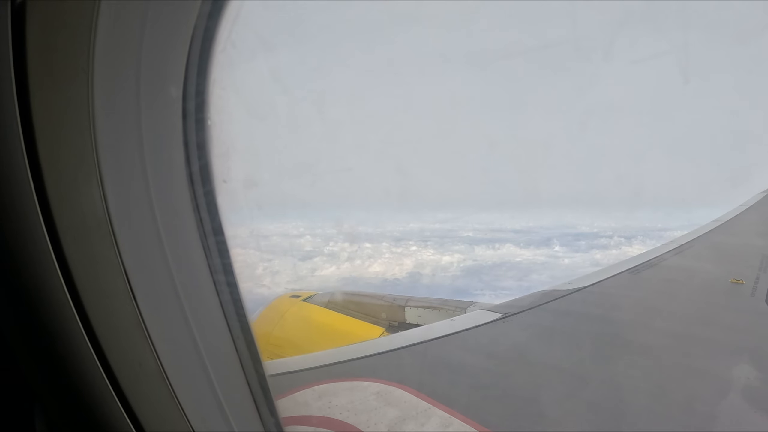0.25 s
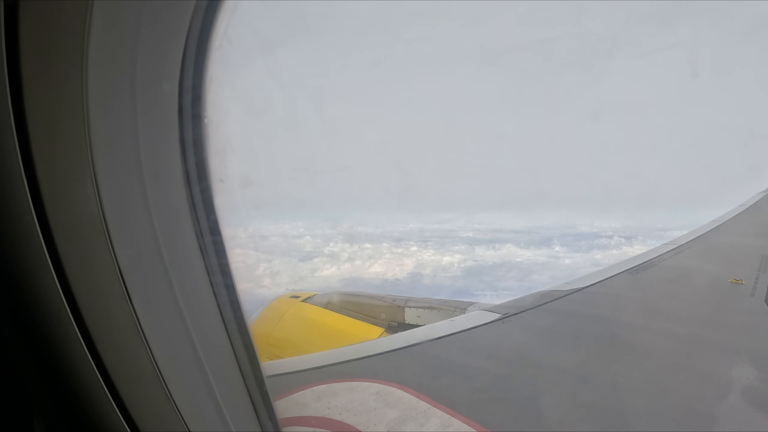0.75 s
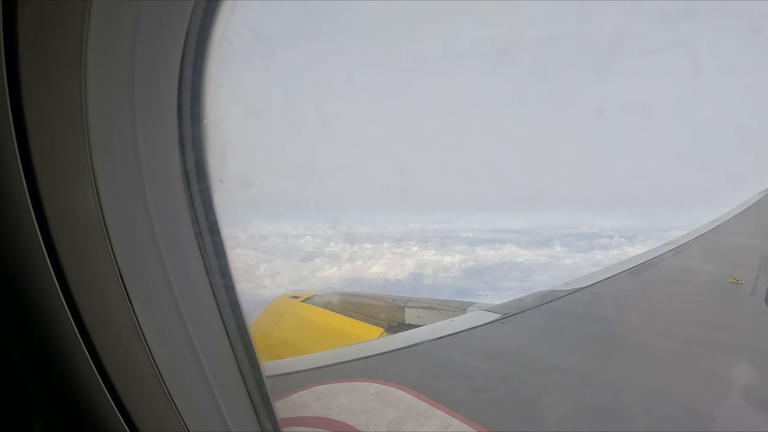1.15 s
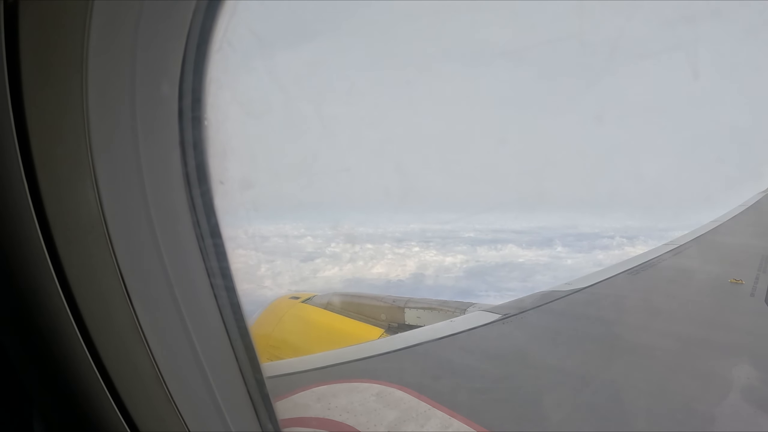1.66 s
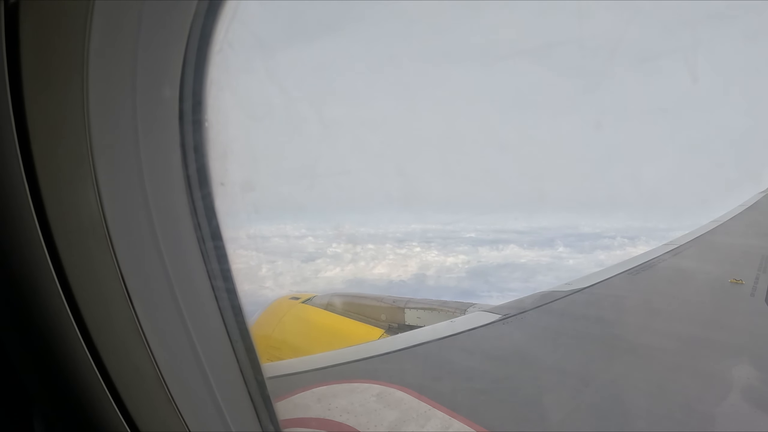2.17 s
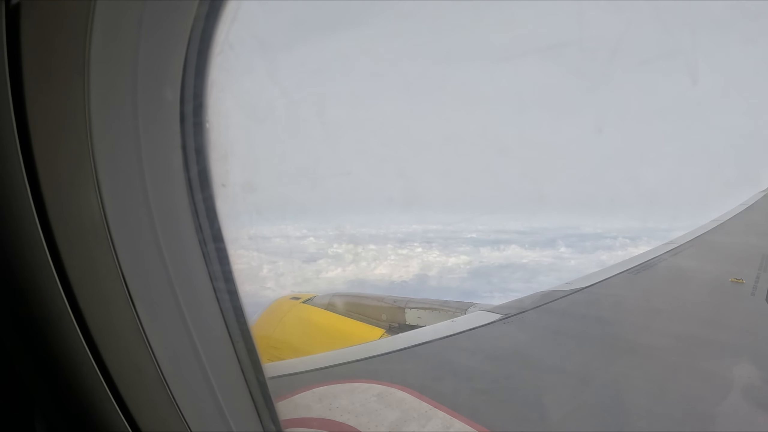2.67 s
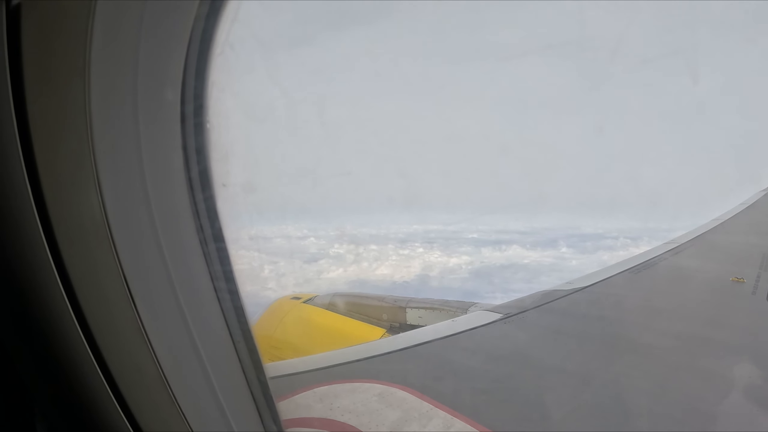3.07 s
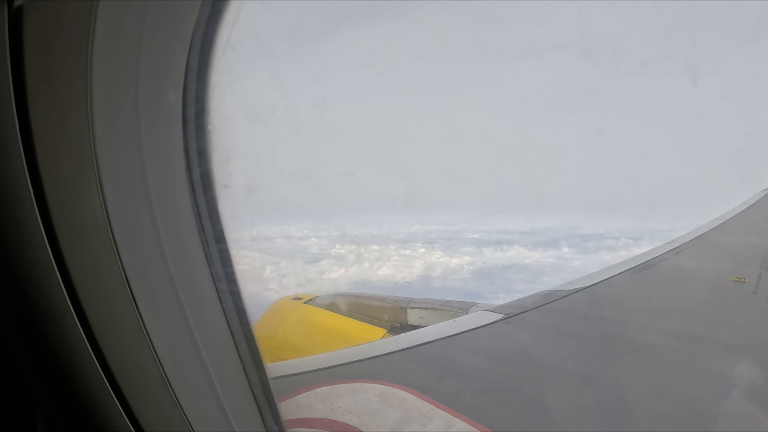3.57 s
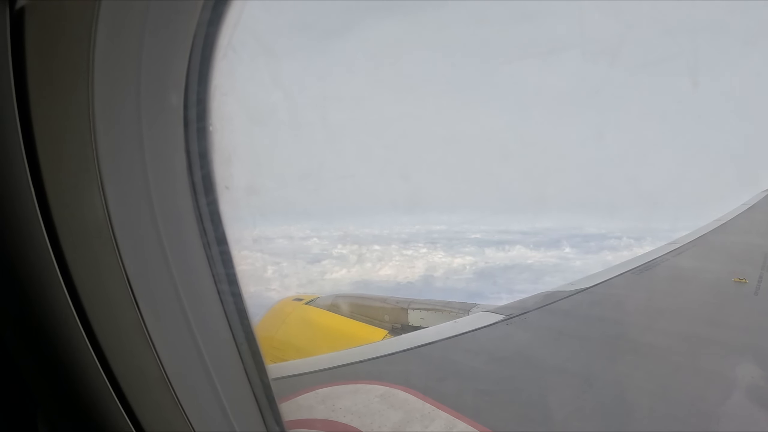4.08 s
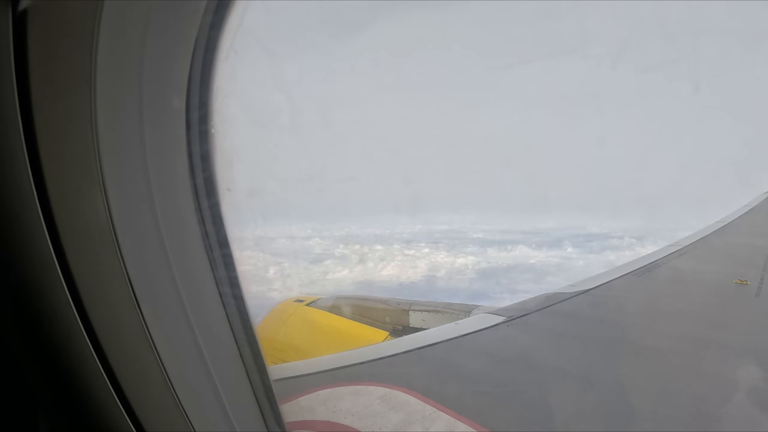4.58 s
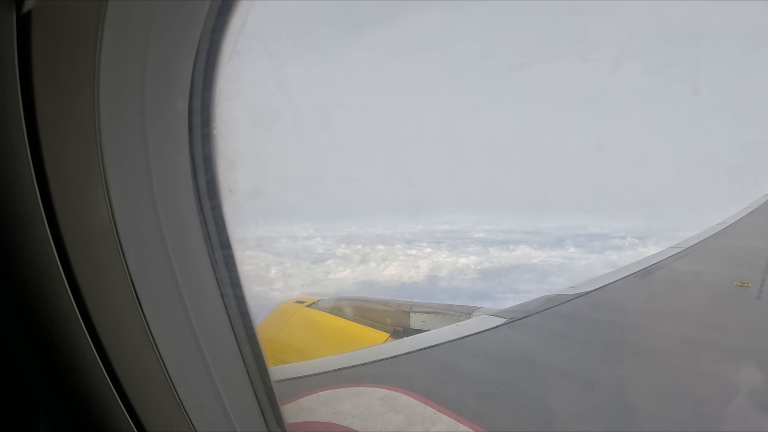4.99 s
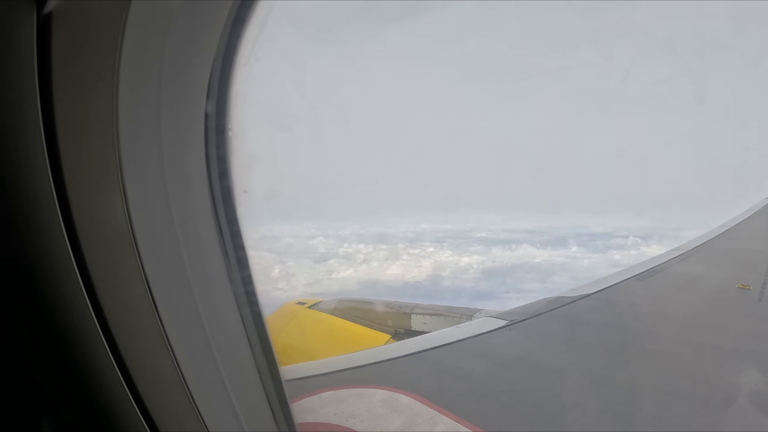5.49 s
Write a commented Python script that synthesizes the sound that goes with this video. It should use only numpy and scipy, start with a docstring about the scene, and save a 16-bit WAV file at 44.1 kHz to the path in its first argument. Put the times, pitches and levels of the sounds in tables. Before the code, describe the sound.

Steady, deep jet cabin roar with a wavering bass hum, soft airy vent hiss, a thin constant whine and a few faint plastic ticks.

```python
"""Airflow over the fuselage of a cruising airliner roars through the cabin wall: resonance-shaped noise.
Engine shafts hum and beat in the bass as slightly wandering sines, and a hollow noise band throbs evenly.
The vents hiss as duct-coloured noise with a narrow-band whistle, and fans and pumps whine as thin tones.
A few faint plastic ticks sound close to the window seat: decaying noise bursts."""
import sys
import numpy as np
from scipy import signal
from scipy.fft import rfft, irfft, next_fast_len
from scipy.io import wavfile
from scipy.ndimage import uniform_filter1d, minimum_filter1d, map_coordinates

SR = 44100
rng = np.random.default_rng(int(sys.argv[2]) if len(sys.argv) > 2 else 0)


def pcm_store(signal):
    """Save signal as 16-bit PCM."""
    levels = np.round(np.clip(np.atleast_2d(signal), -1, 1) * 32767)
    wavfile.write(sys.argv[1], SR, levels.astype(np.int16).T)


N = 253134  # length [samples]


def amp(db):
    """Logarithmic level: decibels to amplitude gain."""
    return 10 ** (np.asarray(db) / 20)


def unit(x):
    """Normalisation by mean power: scale to rms 1."""
    return x / np.sqrt(np.mean(x ** 2) + 1e-20)


def along(points, hz):
    """Logarithmic frequency scale: interpolate (frequency [Hz], value) points along it."""
    f, v = np.transpose(points)
    return np.interp(np.log(hz + 1), np.log(f + 1), v)


def humps(rows, hz):
    """Resonance: sum bell-shaped gains [dB], each falling to half its dB at half its width from the centre."""
    return sum(db * np.exp2(-(2 * (hz - centre) / width) ** 2) for centre, width, db in rows)


def curves(rows):
    """Envelope: interpolate each column of (time [s], value, ..) rows at every sample."""
    s, *columns = np.transpose(rows)
    return [np.interp(np.arange(N) / SR, s, column) for column in columns]


def wobble(rate):
    """Random modulation: a smooth curve through `rate` normally distributed knots a second."""
    knots = rng.standard_normal(int(N * rate / SR) + 4)
    return map_coordinates(knots, [np.arange(N) * rate / SR])


def filtered(x, response):
    """Linear filtering: multiply the spectrum of x by a response of frequency."""
    m = next_fast_len(N + SR // 2)
    hz = np.fft.rfftfreq(m, 1 / SR)
    return irfft(rfft(x, m) * response(hz), m)[..., :N]


def panned(lean_db):
    """Interaural level difference: left and right gains, positive dB to the left."""
    return amp(np.array([[.5], [-.5]]) * lean_db)


# likeness of the two channels: (frequency [Hz], correlation)
CHANNEL_CORRELATION = [(40, .9995), (90, .998), (180, .99), (350, .96), (700, .93), (1350, .84),
                       (2600, .52), (4600, .67), (9000, .55)]
# lean to the left: (frequency [Hz], left-right difference [dB])
LEFT_LEAN = [(90, 0), (280, -1), (680, 1), (1100, 1.5), (1700, -0.5), (2700, 4), (4100, 2.5), (5200, -0.5),
             (7400, 4.5), (9800, 2), (12000, 6)]


def rush(colour_db, patchy_db):
    """Diffuse sound field: noise of rms 1 with turbulent patches, the channels nearly alike in the bass."""
    z = signal.stft(rng.standard_normal((2, N)), nperseg=512)[2]
    # smooth over frequency, then over time, to make patches shared by both channels
    field = uniform_filter1d(rng.standard_normal(z.shape[1:]), size=7, axis=0)
    field = uniform_filter1d(field, size=16, axis=1)
    pair = signal.istft(z * amp(patchy_db * unit(field)), nperseg=512)[1][:, :N]

    def mid_side_response(hz):
        # the mid-side power balance sets the correlation of left and right
        turn = np.arccos(np.clip(along(CHANNEL_CORRELATION, hz), -1, 1)) / 2
        return amp(colour_db(hz)) * [np.cos(turn), np.sin(turn)]

    mid, side = filtered(pair, mid_side_response)
    left_right = np.array([mid + side, mid - side])
    return unit(filtered(left_right, lambda hz: panned(along(LEFT_LEAN, hz))))


def tone(hz, wander, rate):
    """Frequency modulation: a sine of rms 1 whose pitch wanders on the scale of `wander` [Hz]."""
    turns = np.cumsum(hz + wander * wobble(rate)) / SR + rng.random()
    return np.sqrt(2) * np.sin(2 * np.pi * turns)


# spectrum of the airflow heard through the wall: (frequency [Hz], relative density [dB per Hz])
ROAR_SPECTRUM = [(10, -22.5), (20, -15.5), (27, -4.5), (34, -12.5), (44, 1.5), (65, -2), (135, -3.5),
                 (200, -5), (345, -6), (420, -13), (600, -15.5), (840, -21.5), (1250, -24), (1780, -34),
                 (2600, -110)]
# wall panel and cabin resonances, and the hollows between: (frequency [Hz], width [Hz], gain [dB])
PANEL_RESONANCES = [(73, 16, -2), (102, 13, 4), (182, 39, 5.5), (223, 20, -0.5), (272.7, 35.6, 4.5),
                    (322, 19, -3), (333, 16, 2), (497, 105, 4.5), (698.5, 40, 4), (760, 50, 1)]


def airflow():
    """Boundary-layer excitation: the flow shakes the wall, whose panels favour their own resonances."""
    colour_db = lambda hz: along(ROAR_SPECTRUM, hz) + humps(PANEL_RESONANCES, hz)
    return amp(-17.0) * rush(colour_db, patchy_db=.5)


# near engine's shaft speeds [turns/s] and the slow shaft's steady loss of speed [Hz/s]
SLOW_SHAFT_HZ, FAST_SHAFT_HZ, SAG_HZ_PER_S = 81.85, 164.25, .07
# the other engine's slow shaft: speed [turns/s], level [dB]
FAR_SHAFT_HZ, FAR_HUM_DB = 84.1, -41
# the slow shaft's hum, a steady tone mixed with low noise that makes its level waver by chance:
# (time [s], level [dB])
SLOW_HUM_LEVEL = [(0, -21.5), (.5, -23.5), (.75, -30), (1.1, -28), (1.35, -23), (1.65, -24.5), (2.3, -22.5),
                  (2.55, -26.5), (3, -21.5), (3.25, -25.5), (3.5, -22), (4.2, -20.7), (4.65, -24),
                  (5.05, -23.5), (5.3, -20), (5.7, -21)]
# the fast shaft's hum, a steady tone mixed with low noise that makes its level waver by chance:
# (time [s], level [dB])
FAST_HUM_LEVEL = [(0, -28.5), (.3, -24.5), (.7, -28.5), (.9, -24.2), (1.4, -28), (1.7, -20.5), (1.9, -27),
                  (2.1, -24.5), (2.4, -29), (2.85, -25.5), (3.45, -28), (3.6, -23.5), (4.17, -30),
                  (4.47, -21), (4.83, -29.5), (5.15, -23.5), (5.45, -24), (5.7, -32)]


def shafts():
    """Rotating unbalance and beats: shaft hums come through the wings, and two close speeds beat faintly."""
    slow_db, = curves(SLOW_HUM_LEVEL)
    fast_db, = curves(FAST_HUM_LEVEL)
    slow_hz = SLOW_SHAFT_HZ - SAG_HZ_PER_S * np.arange(N) / SR
    slow = amp(slow_db) * tone(slow_hz, wander=0.08, rate=1.9)
    fast = amp(fast_db) * tone(FAST_SHAFT_HZ, wander=0.3, rate=4.4)
    far = amp(FAR_HUM_DB) * tone(FAR_SHAFT_HZ, wander=0.34, rate=1.9)
    return slow + fast + far


# spectrum of the hollow engine noise: (frequency [Hz], relative density [dB per Hz])
ENGINE_SPECTRUM = [(600, -110), (830, -30.0), (885, -12), (915, -3.0),
                   (950, -5), (1020, -11.0), (1200, -20.5), (2000, -110)]
BAND_DB, BAND_FADE_DB_PER_S = -36.5, .3  # mean level, slow fall
THROB_DB, THROB_HZ, FIRST_CREST_S = 1.5, 2.53, .1  # swing each way, rate, time of a crest


def engine_band():
    """Amplitude modulation: a narrow band of engine noise throbs evenly while slowly receding."""
    t = np.arange(N) / SR
    throb = np.cos(2 * np.pi * THROB_HZ * (t - FIRST_CREST_S))
    level_db = BAND_DB + THROB_DB * throb - BAND_FADE_DB_PER_S * (t - t.mean())
    return amp(level_db) * rush(lambda hz: along(ENGINE_SPECTRUM, hz), patchy_db=0.4)


# spectrum of the air from the vents: (frequency [Hz], relative density [dB per Hz])
VENT_SPECTRUM = [(500, -12), (1900, 3), (2650, 1), (3150, -3), (3550, -2.5), (3900, -6.5), (4450, -6),
                 (5600, -16), (6500, -18.5), (7450, -15.5), (8450, -25), (10000, -26), (11600, -33.5),
                 (14500, -46.5)]
# duct resonances and notches that colour the hiss: (frequency [Hz], width [Hz], gain [dB])
DUCT_RESONANCES = [(2050, 60, -1.5), (2230, 70, -2.5), (2980, 100, 2.5), (3150, 70, -2.5), (3320, 80, -1),
                   (3950, 110, 1.5), (3880, 80, -2), (4200, 200, 1.5), (8040, 200, 2), (8300, 400, -1),
                   (11080, 160, 2.5)]


def vents():
    """Duct resonance: the ducts colour a hiss of air whose level flutters slightly."""
    colour_db = lambda hz: along(VENT_SPECTRUM, hz) + humps(DUCT_RESONANCES, hz)
    return amp(-43.0 + 0.15 * wobble(7)) * rush(colour_db, patchy_db=0.58)


# breathy nozzle whistle, before its flutter: (time [s], level [dB])
WHISTLE_LEVEL = [(0, -62.5), (.55, -60), (1.1, -64.5), (2.3, -68), (2.7, -62.5), (3.1, -68), (5.7, -70)]


def nozzle_whistle():
    """Narrow-band noise: a breathy whistle near 3570 Hz that comes and goes, leaning left."""
    level_db, = curves(WHISTLE_LEVEL)
    # the amplitude response halves 58 Hz from the centre
    response = lambda hz: np.exp2(-((hz - 3570) / 58) ** 2)
    whistle = unit(filtered(rng.standard_normal(N), response))
    return panned(4) * amp(level_db + 1.2 * wobble(13)) * whistle


# tones of fans and pumps: (frequency [Hz], mean level [dB], wander scale [Hz], left-right difference [dB])
FAN_TONES = [(535, -44.5, .4, 0), (1314, -43.9, .7, 1), (1323.3, -57, 1.2, 0), (1603, -60, 2, 0),
             (2145, -62.5, 2.5, 2), (2627, -67, 3, 4), (3207, -70, 2, -3), (3580, -68.5, 4, 5),
             (7198, -81, 3, 4)]


def fans():
    """Tonal machine noise: thin sines, each slightly unsteady in pitch and level."""
    out = np.zeros((2, N))
    for hz, db, wander, lean_db in FAN_TONES:
        level_db = db + .6 * wobble(6)
        out += panned(lean_db) * amp(level_db) * tone(hz, wander, rate=9)
    return out


# small plastic ticks: (time [s], snap level [dB], tail level relative to the snap [dB], tail t60 [s],
# ring gain [dB], brightness [dB per octave])
PLASTIC_TICKS = [(.889, -54.5, 0, .07, -5, 4), (2.6582, -38.5, -2.5, .034, 0, 0),
                 (2.808, -54, 0, .12, 0, -1), (2.9093, -42.5, -4.5, .05, 4, 0), (3.299, -51, -1, .06, 1, 0),
                 (3.481, -43.5, -1.5, .065, -4, .3), (3.724, -55, 0, .09, -2, 1),
                 (4.933, -52, -6, .03, 4, -1)]
# spectrum shared by the ticks: (frequency [Hz], relative level [dB])
TICK_SPECTRUM = [(1000, -16), (3500, -2), (5300, 1), (6400, -3), (8000, -10), (10000, -17.5), (12400, -23),
                 (13300, -37), (15000, -55)]
RING_HZ, RING_HALF_WIDTH_HZ = 6200, 550  # the plastic's resonance
SNAP_T60_S = .01  # time for the snap to fall 60 dB


def ticks():
    """Impulsive excitation and decay: a snap and a tail, each tick with its own ring and brightness."""
    t = np.arange(N) / SR
    out = np.zeros(N)
    for s, db, tail_db, t60, ring_db, bright_db in PLASTIC_TICKS:
        decay = lambda length: (t >= s) * amp(-60 * np.abs(t - s) / length)

        def colour(hz):
            ring = ring_db * np.exp2(-((hz - RING_HZ) / RING_HALF_WIDTH_HZ) ** 2)
            tilt = bright_db * np.log2((hz + 1) / RING_HZ)
            return amp(along(TICK_SPECTRUM, hz) + ring + tilt)

        envelope = np.hypot(decay(SNAP_T60_S), amp(tail_db) * decay(t60))
        out += amp(db) * envelope * unit(filtered(rng.standard_normal(N), colour))
    return panned(2.5) * out


def scene():
    """Superposition: the sum of everything heard at the seat."""
    return airflow() + shafts() + engine_band() + vents() + nozzle_whistle() + fans() + ticks()


def limited(x, ceiling_db, knee, size):
    """Dynamic range limiting: a look-ahead gain ducks smoothly under the highest crests; size [samples]."""
    peak = np.abs(x).max(axis=0) / amp(ceiling_db)
    needed = (1 + peak ** knee) ** (-1 / knee)
    held = minimum_filter1d(needed, 2 * size)
    return x * uniform_filter1d(uniform_filter1d(held, size), size)


TOP_HZ = 14400  # upper band limit


def record(dry):
    """Limiting and band limiting: hold down crests, soften both ends and remove the highest treble."""
    even = limited(dry, ceiling_db=-4.3, knee=5, size=120)
    soft_ends = signal.windows.tukey(N, .001)
    low_pass = signal.ellip(8, .1, 60, TOP_HZ, fs=SR, output="sos")
    # forward and backward filtering leaves no phase shift
    return signal.sosfiltfilt(low_pass, even * soft_ends)


dry = scene()
out = record(dry)
pcm_store(out)
```